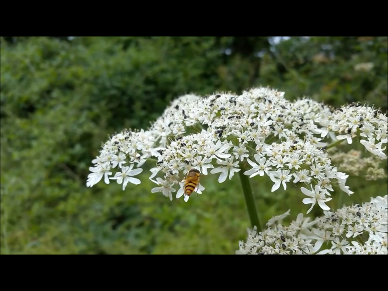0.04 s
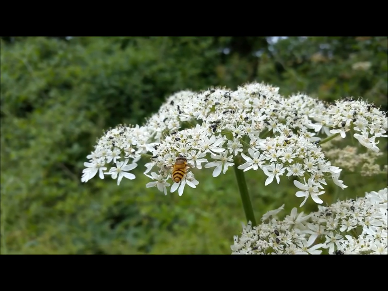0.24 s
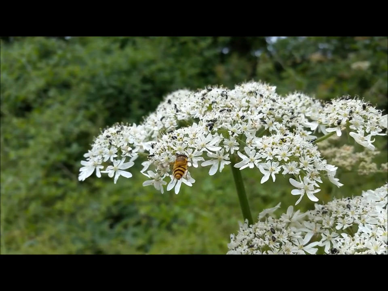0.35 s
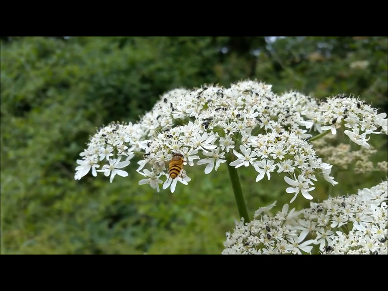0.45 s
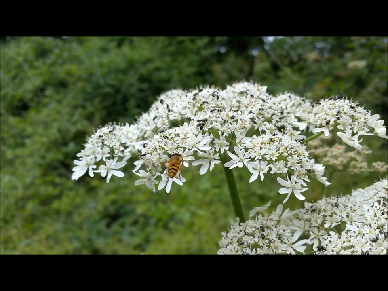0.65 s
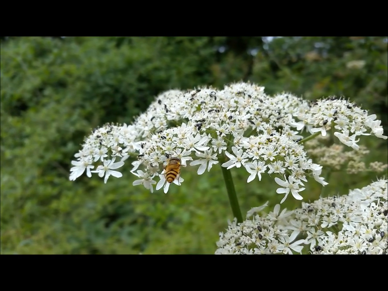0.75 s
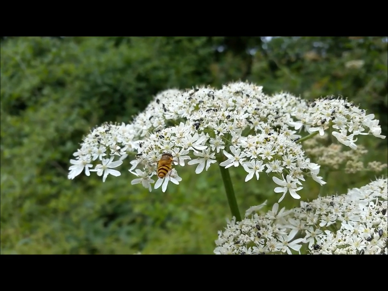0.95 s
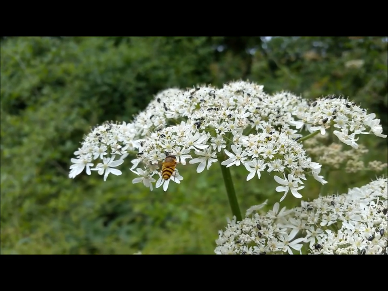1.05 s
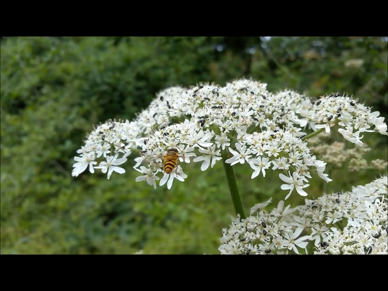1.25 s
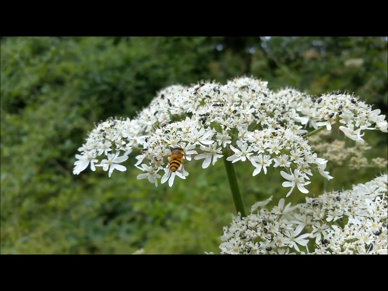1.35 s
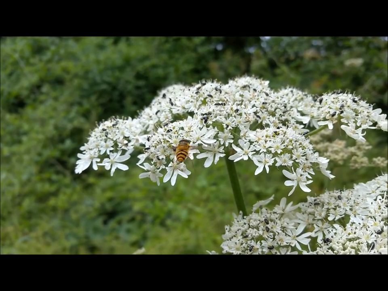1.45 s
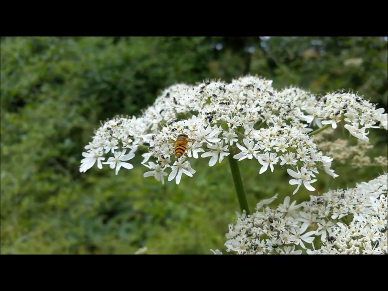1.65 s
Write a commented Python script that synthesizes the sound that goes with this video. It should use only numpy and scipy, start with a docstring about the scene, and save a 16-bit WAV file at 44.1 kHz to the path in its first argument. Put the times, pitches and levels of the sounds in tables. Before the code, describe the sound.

Faint, even hum of a hoverfly over soft outdoor air, broken by brief handling clicks.

```python
"""At a flower head outdoors, a hoverfly sits close to the microphone and hums faintly, a little to the left.
Its flight muscles vibrate periodically, so the hum is a harmonic series on a nearly steady pitch.
Behind it lie a far rumble, steady air and a light breeze in the leaves, each a diffuse noise field.
Handling the camera jolts the left microphone, whose step response is heard as a few sharp pops."""
import sys
import numpy as np
from scipy import signal
from scipy.fft import rfft, irfft
from scipy.io import wavfile

SR = 44100
rng = np.random.default_rng(int(sys.argv[2]) if len(sys.argv) > 2 else 0)


def transcribe(signal):
    """Save signal, clipped to [-1, 1], as a 16-bit WAV file at the path in sys.argv[1]."""
    frames = np.atleast_2d(signal).T
    limited = np.clip(frames, -1, 1)
    pcm = np.round(limited * 32767).astype(np.int16)
    wavfile.write(sys.argv[1], SR, pcm)


N = 74970

# vibration rate of the flight muscles: time_s, pitch_hz
MUSCLE_PITCH = [(0, 245.4), (.16, 245.5), (.3, 243.8), (.52, 246), (.65, 245.5), (.76, 246.1), (.82, 244.1),
                (.95, 244.1), (1.02, 245.1), (1.09, 243.3), (1.16, 245.6), (1.3, 243), (1.42, 245),
                (1.48, 243.3), (1.6, 244.3), (1.66, 241.5), (1.7, 243)]
# harmonics of the hum, from the fundamental up: left_rms_db, right_minus_left_db
HUM_HARMONICS = [(-55, -11), (-67.5, -6), (-77, 0), (-63.5, -5.5), (-61.5, -6), (-68.5, -4.5),
                 (-68.5, -7.5), (-65.5, -7), (-70, -15), (-81.5, -14), (-93, 4), (-86, 1), (-84, 0),
                 (-90, -1), (-90, -4), (-87.5, -9), (-88, -8)]
# jolts of the left microphone: start_s, step_db, corner_hz
JOLTS = [(0.22853, -11.4, 11000), (0.22902, -12.8, 11000), (0.22959, -12.5, 11000), (0.31263, -4.0, 5500),
         (0.50704, -5.4, 13000), (0.54576, -12.8, 11000), (0.54778, -11.2, 11000)]
# swell of the breeze: time_s, gain_db
BREEZE_LEVEL = [(0, -9), (.1, -7.5), (.2, -2), (.36, -2.5), (.48, -0.5), (.66, -5.5), (.78, -3), (.91, -2),
                (1.08, -10.5), (1.35, -21.5), (1.7, -18.5)]
# spectrum of the rustling leaves: frequency_hz, density_db (power per hertz)
LEAF_SPECTRUM = [(30, -76), (85, -82), (200, -83), (310, -79), (520, -94.5), (900, -89.5), (2100, -92),
                 (3400, -100), (5000, -113), (7000, -117), (15000, -114)]
# swell of the far rumble: time_s, gain_db
RUMBLE_SWELL = [(0, -3), (.5, -2), (.67, 2.5), (1.15, 1), (1.35, -2), (1.7, -5.5)]
# spectrum of the far rumble: frequency_hz, density_db
RUMBLE_SPECTRUM = [(20, -90), (50, -79.5), (90, -76.5), (118, -80.5), (142, -75), (185, -96), (400, -110),
                   (1500, -150)]
# spectrum of the steady air: frequency_hz, density_db
AIR_SPECTRUM = [(20, -97), (48, -81), (90, -81), (142, -87), (190, -90), (300, -90), (550, -95.5),
                (1100, -91.5), (1600, -94.5), (2300, -104), (3400, -107), (5000, -112.5), (6300, -113.5),
                (8200, -110.5), (15000, -110.5)]
# likeness of the noise at the two microphones: frequency_hz, correlation (limited to +-0.99 in use)
CORRELATION = [(110, 1.05), (380, 0.7), (700, 0.66), (1300, -0.5), (2400, 0.45), (4400, -0.15), (9000, 0)]
# level difference of the noise between the microphones: frequency_hz, left_minus_right_db
NOISE_BALANCE = [(100, 1.1), (500, 2.1), (1200, 5.9), (2600, 0.41), (5000, 0.22), (12000, 2.4)]


def hoverfly(jitter_share=.0015, jitter_hz=30, waver_db=.9, waver_hz=5, right_lag_s=.00023):
    """Periodic muscle vibration radiates harmonics, which reach the farther, right microphone later."""
    pitch_hz = in_time(MUSCLE_PITCH) * (1 + jitter_share * drift(jitter_hz))
    cycles = np.cumsum(pitch_hz) / SR - np.array([[0], [right_lag_s]]) * pitch_hz
    hum = np.zeros((2, N))
    for harmonic, (left_db, right_minus_left_db) in enumerate(HUM_HARMONICS, 1):
        rms = from_db(left_db + np.array([[0], [right_minus_left_db]]) + waver_db * drift(waver_hz))
        hum += rms * np.sqrt(2) * np.sin(2 * np.pi * (harmonic * cycles + rng.random()))
    return hum


def handling_pops():
    """Step response: the left microphone, a high-pass, turns each jolt into a spike and a slow swing back."""
    steps = np.zeros(N)
    for start_s, step_db, corner_hz in JOLTS:
        step = from_db(step_db) * np.clip(np.arange(N) - start_s * SR, 0, 1)
        pole = np.exp(-2 * np.pi * corner_hz / SR)
        steps += signal.lfilter([1 - pole], [1, -pole], step)   # rounds the edge
    pops = high_pass(steps, hz=93.7, q=.81) + 1e-18
    pops = bell(pops, hz=1820, gain_db=1.18, q=2.4)   # the microphone's colour
    pops = bell(pops, hz=5980, gain_db=-29.5, q=2.92)
    return np.array([pops, np.zeros(N)])


def leaves():
    """Amplitude modulation: the rustle of the leaves rises and falls with the breeze."""
    return diffuse_noise(LEAF_SPECTRUM) * from_db(in_time(BREEZE_LEVEL))


def far_rumble():
    """Low-frequency noise swells and fades under a slow envelope."""
    return diffuse_noise(RUMBLE_SPECTRUM) * from_db(in_time(RUMBLE_SWELL))


def steady_air():
    """Stationary noise forms the ambient floor, from deep bass to fine hiss."""
    return diffuse_noise(AIR_SPECTRUM)


def diffuse_noise(spectrum):
    """A diffuse field is correlated at two microphones in the bass and uncorrelated in the high treble."""
    hz = np.fft.rfftfreq(N, 1 / SR)
    mid, side = rfft(rng.standard_normal((2, N)))
    correlation = np.clip(at_hz(CORRELATION, hz), -.99, .99)
    sign = np.array([[1], [-1]])   # left, right
    pair = np.sqrt((1 + correlation) / 2) * mid + sign * np.sqrt((1 - correlation) / 2) * side
    density_db = at_hz(spectrum, hz) + sign * at_hz(NOISE_BALANCE, hz) / 2
    gain = from_db(density_db) * np.sqrt(SR / 2)
    return steep_low_pass(irfft(pair * gain, N), hz=15700)


def drift(corner_hz):
    """Low-passed noise wanders slowly, scaled here to unit variance."""
    hz = np.fft.rfftfreq(2 * N, 1 / SR)
    slow = irfft(rfft(rng.standard_normal(2 * N)) / (1 + (hz / corner_hz) ** 2))
    return slow[:N] / slow.std()


def from_db(db):
    """Amplitude grows tenfold every 20 decibels."""
    return 10 ** (np.asarray(db) / 20)


def in_time(rows):
    """Linear interpolation gives a control value at every sample."""
    time_s, value = np.transpose(rows)
    return np.interp(np.arange(N) / SR, time_s, value)


def at_hz(rows, hz):
    """Interpolation along log frequency gives a continuous curve."""
    knots_hz, value = np.transpose(rows)
    return np.interp(np.log(np.maximum(hz, 1)), np.log(knots_hz), value)


def steep_low_pass(x, hz):
    """Convolution with a windowed sinc removes the band above the cutoff."""
    return signal.fftconvolve(x, signal.firwin(255, hz, fs=SR)[None], mode="same", axes=1)


def bell(x, hz, gain_db, q):
    """A second-order resonance raises or lowers one band."""
    w, a = 2 * np.pi * hz / SR, np.sqrt(from_db(gain_db))
    k = np.sin(w) / (2 * q)
    return signal.lfilter([1 + k * a, -2 * np.cos(w), 1 - k * a], [1 + k / a, -2 * np.cos(w), 1 - k / a], x)


def high_pass(x, hz, q):
    """A two-pole high-pass falls 12 dB per octave below its corner."""
    w = 2 * np.pi * hz / SR
    k = np.sin(w) / (2 * q)
    return signal.lfilter(np.array([1, -2, 1]) * (1 + np.cos(w)) / 2, [1 + k, -2 * np.cos(w), 1 - k], x)


def scene():
    """Superposition: the background, the hum and the pops add linearly."""
    background = far_rumble() + leaves() + steady_air()
    return background + hoverfly() + handling_pops()


def record(dry):
    """Band limiting removes the highest treble."""
    return steep_low_pass(dry, hz=16750)


dry = scene()
out = record(dry)
transcribe(out)
```